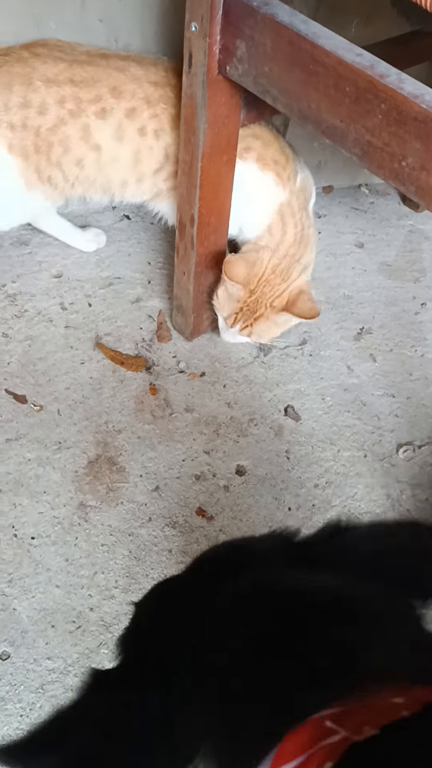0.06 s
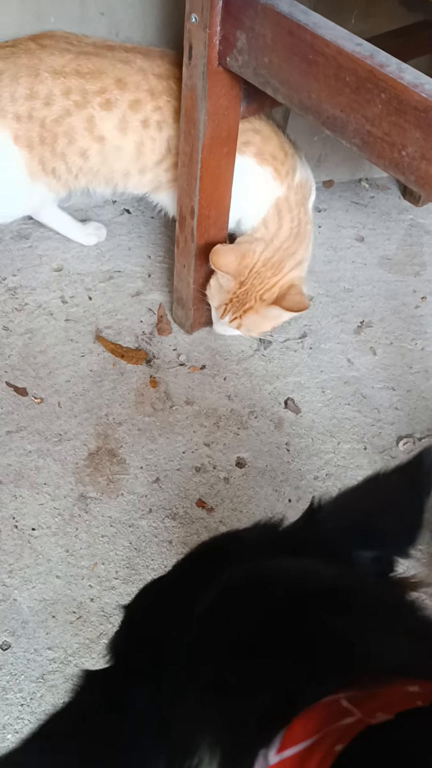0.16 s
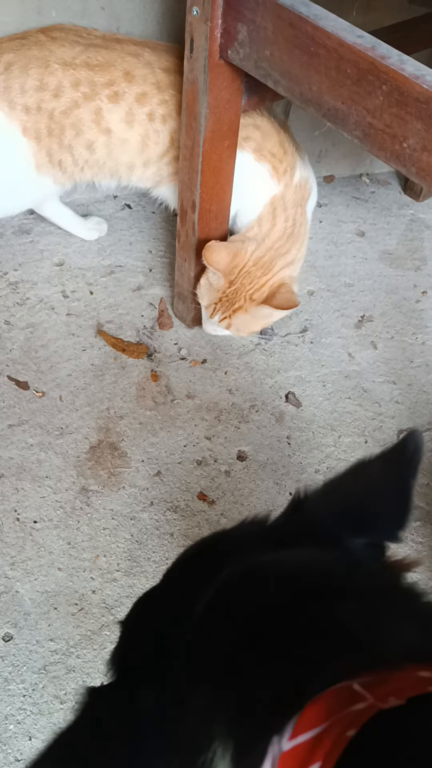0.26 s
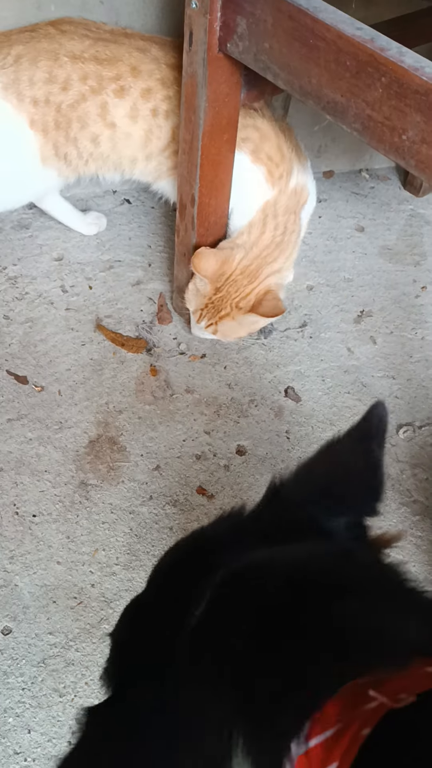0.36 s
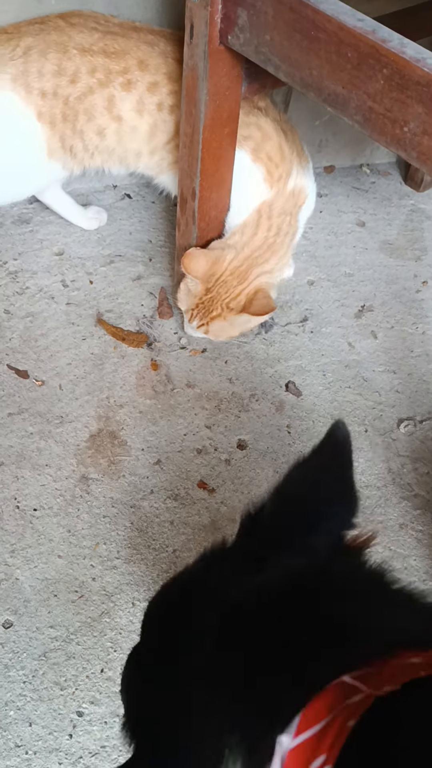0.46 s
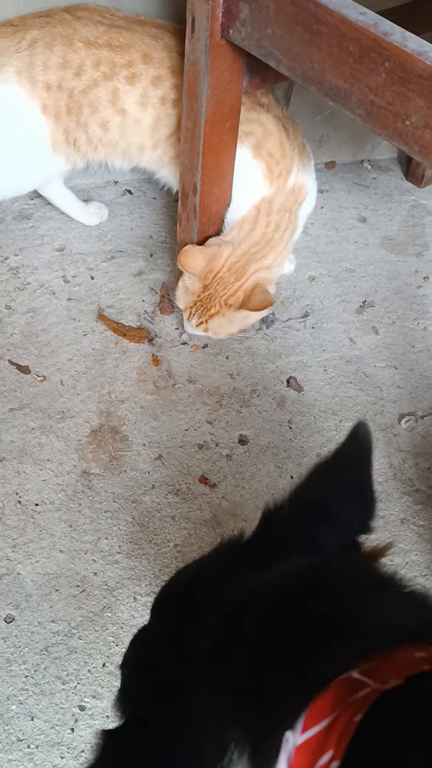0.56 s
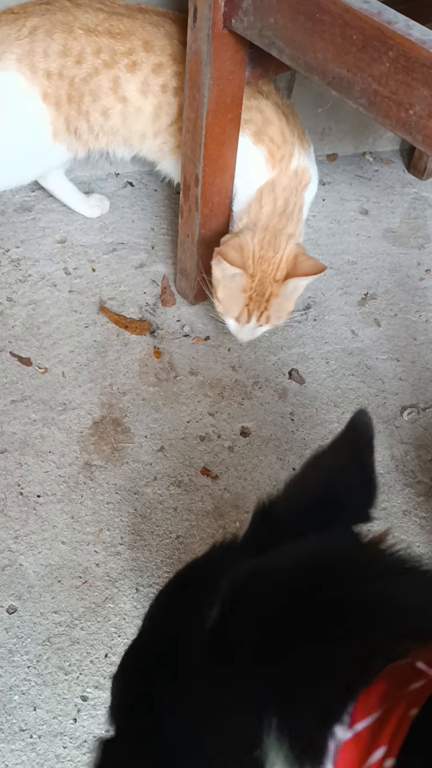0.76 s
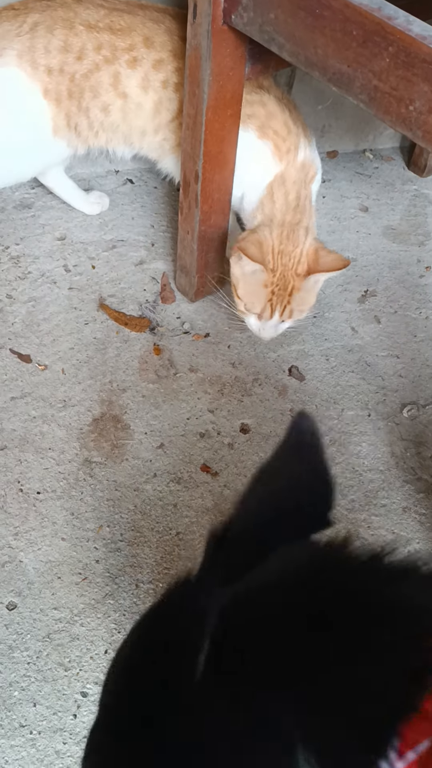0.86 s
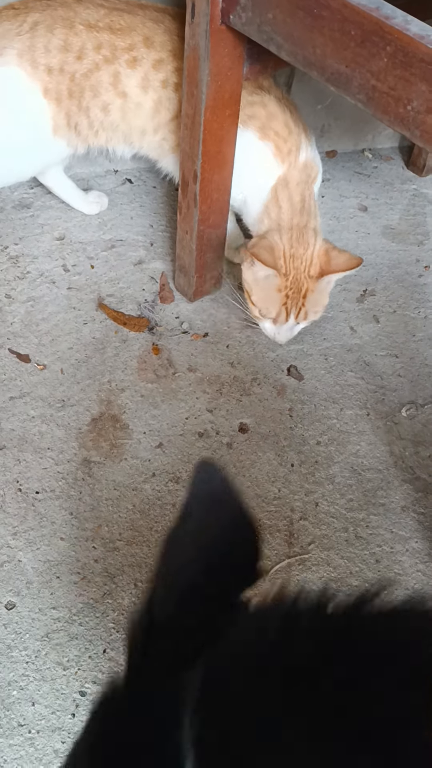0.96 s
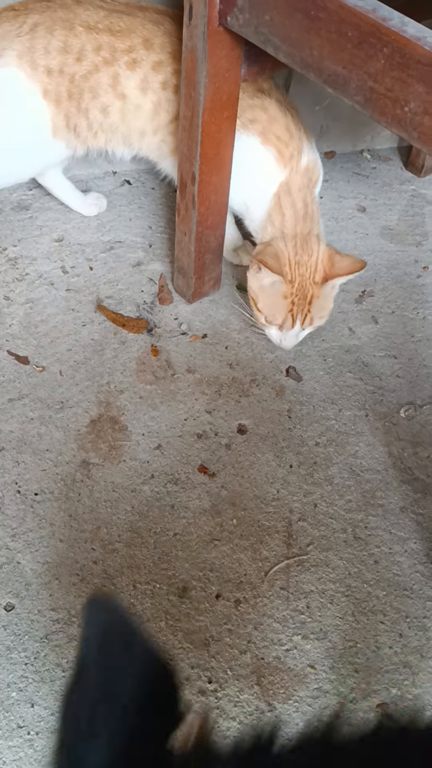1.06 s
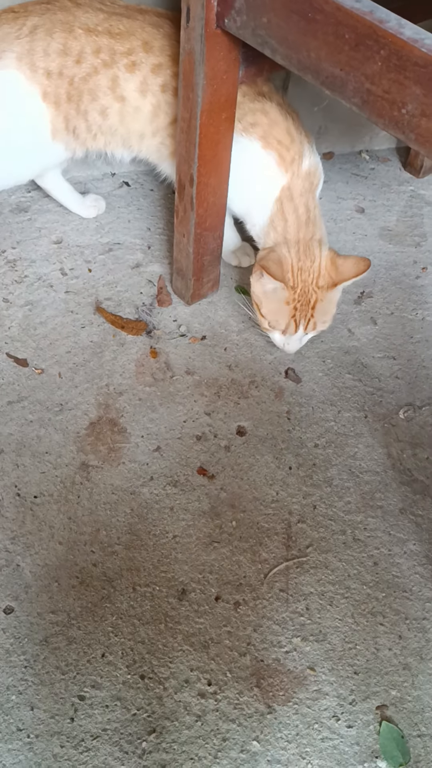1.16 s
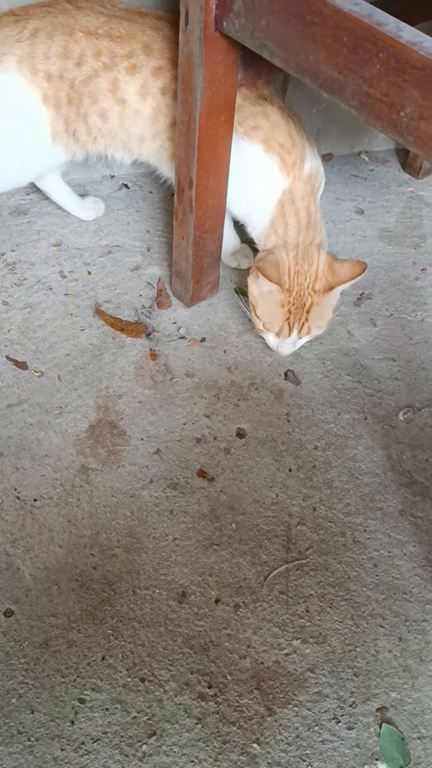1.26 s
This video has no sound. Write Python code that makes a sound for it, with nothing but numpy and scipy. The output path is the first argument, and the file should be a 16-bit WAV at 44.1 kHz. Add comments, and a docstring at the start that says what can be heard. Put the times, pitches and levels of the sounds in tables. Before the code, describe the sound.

Two sharp cat snarls close by, raspy spits over low growl, the second stronger and longer.

```python
"""Two snarls of a cat guarding its food

A cat snarls twice at another cat, on a concrete floor between hard walls.
Each snarl joins explosive spits of rasping, resonance-filtered air to surges of a low closed-mouth growl
and a short, cracked yowl, the stronger one in the second snarl.
Thin wheezes of narrow-band noise come before, between and after; a soft knock is heard near the start.
Beneath lie quiet air noise, a hum of wavering tones and a rumble of low noise that rises and falls."""
import sys
import numpy as np
from scipy import signal
from scipy.fft import rfft, irfft
from scipy.io import wavfile

SR = 44100
rng = np.random.default_rng(int(sys.argv[2]) if len(sys.argv) > 2 else 0)


def transcribe(u):
    """Save the signal u as a 16-bit wav file named by the first command-line argument.

    u: samples, shape (n,) or (channels, n), limited to [-1, 1]; the rate is SR.
    q: integer samples, one column per channel.
    """
    v = np.clip(np.atleast_2d(u).T, -1, 1)
    q = np.round(v * 32767).astype(np.int16)
    wavfile.write(sys.argv[1], SR, q)


N = 57330
T = np.arange(N) / SR  # s
HZ = np.fft.rfftfreq(N, 1 / SR)


def amp(db):
    """Decibel law: level to amplitude gain."""
    return 10 ** (np.asarray(db) / 20)


def unit(x):
    """Normalisation: scales to rms 1."""
    return x / np.sqrt(np.mean(x ** 2) + 1e-20)


def read(points, hz=HZ):
    """Interpolation: reads a table along a log-frequency axis."""
    f, value = np.transpose(points)
    return np.interp(np.log(hz + 1), np.log(f + 1), value)


def colour(x, db):
    """Linear filtering: each frequency gets its own gain in dB."""
    return irfft(rfft(x) * amp(db), N)


def noise(db):
    """Filtered noise: a random signal of rms 1 with the given spectrum."""
    return unit(colour(rng.standard_normal(N), db))


def band(hz, width_hz):
    """Steep resonance: a spectrum in dB, 6 dB down at width_hz either side."""
    return -20 * np.log10(1 + ((HZ - hz) / width_hz) ** 2)


def bump(hz, width_hz, lift_db):
    """Broad resonance: the lift in dB that it gives each frequency."""
    return lift_db / (1 + (2 * (HZ - hz) / width_hz) ** 2)


def envelope(start, rise, hold, t60, db):
    """Transient envelope: linear rise, hold and exponential decay."""
    attack = np.clip((T - start) / rise, 0, 1)
    fade_time = np.maximum(T - start - rise - hold, 0)
    return attack * amp(db - 60 * fade_time / t60)


def cycles(hz, jitter, rate_hz=90):
    """Frequency modulation: the phase of a vibration whose pitch wanders at random."""
    wander = jitter * noise(band(0, rate_hz))
    return 2 * np.pi * np.cumsum(hz * (1 + wander)) / SR


# likeness of left and right: (frequency [Hz], correlation [1])
LIKENESS = [(60, 1), (250, 0.86), (500, 0.63), (1000, 0.083), (2500, 0.017), (15000, 0.039)]


def pair(a, b):
    """Interchannel coherence: two unrelated signals become left and right, alike in the bass."""
    same = np.clip(read(LIKENESS), -1, 1)
    mid = rfft(a) * np.sqrt((1 + same) / 2)
    side = rfft(b) * np.sqrt((1 - same) / 2)
    return irfft([mid + side, mid - side], N)


# spectrum of the quiet air: (frequency [Hz], relative density [dB per Hz])
FLOOR_SPECTRUM = [(20, -40), (42, -49), (65, -11), (115, -1.5), (145, -17), (200, -10), (320, -14),
                  (450, -21), (600, -23.5), (850, -25.5), (1500, -30.5), (2300, -28), (4000, -35.5),
                  (7500, -46.5), (16000, -52)]
# steady tones of the hum: (frequency [Hz], level [dB])
HUM_TONES = [(75, -52), (269, -54.5), (317.6, -53.5), (587, -55)]
# course of the rumble: (time [s], level [dB])
RUMBLE_COURSE = [(0, -66), (.27, -56), (.41, -34.5), (.56, -61), (.75, -40.5), (.97, -53), (1.22, -39.5)]
FLOOR_DB = -42
HUM_WAVER = 0.0039  # rms share of pitch
RUMBLE_HZ, RUMBLE_WIDTH_HZ = 78.4, 7.3


def background():
    """Superposition: diffuse air noise, wavering hum tones and narrow-band rumble add."""
    air = amp(FLOOR_DB) * pair(noise(read(FLOOR_SPECTRUM)), noise(read(FLOOR_SPECTRUM)))
    hum = sum(amp(db) * unit(np.cos(cycles(hz, HUM_WAVER, rate_hz=6.1))) for hz, db in HUM_TONES)
    rumble_gain = amp(np.interp(T, *np.transpose(RUMBLE_COURSE)))
    rumble = rumble_gain * noise(band(RUMBLE_HZ, RUMBLE_WIDTH_HZ))
    return air + hum + rumble


# thin wheezes of the cat: (start [s], length [s], level before the rise and sink are applied [dB],
# whistle frequency [Hz], hiss relative to whistle [dB])
WHEEZE_EVENTS = [(0, 0.026, -38.5, 2280, 3), (0.078, 0.067, -43.5, 2280, -12.5),
                 (0.115, 0.04, -35, 2066, -10), (.156, 0.037, -44.5, 1930, -0.5),
                 (0.21, 0.061, -34, 2150, 0.5), (0.459, 0.045, -30.5, 2100, -4.5),
                 (0.742, 0.043, -47, 2170, -2), (1.095, 0.047, -50, 1900, -6),
                 (1.179, 0.042, -48.5, 2220, -15)]
# spectrum of the hiss: (frequency [Hz], relative density [dB per Hz])
WHEEZE_HISS = [(1000, -51), (2000, 2), (2900, -1.5), (3650, 8.5), (4400, -7.5), (5700, -4.5), (7500, -29),
               (16000, -28)]
WHEEZE_WIDTH_HZ, WHEEZE_RISE_S = 122, 0.011


def wheeze(start, length, db, hz, breathy_db):
    """Resonant noise: a fuzzy whistle and some hiss start quickly and sink."""
    rise = np.clip((T - start) / WHEEZE_RISE_S, 0, 1)
    sink = np.sqrt(np.clip(1 - (T - start) / length, 0, 1))
    whistle_air, hiss_air = (pair(*rng.standard_normal((2, N))) for _ in range(2))
    whistle = unit(colour(whistle_air, band(hz, WHEEZE_WIDTH_HZ)))
    hiss = unit(colour(hiss_air, read(WHEEZE_HISS)))
    return amp(db) * rise * sink * unit(whistle + amp(breathy_db) * hiss)


# soft knock: (start [s], rise [s], hold [s], fade t60 [s], level [dB])
KNOCK_EVENTS = [(.043, 0.0045, 0.0056, 0.096, -34)]
# spectrum of the knock: (frequency [Hz], relative density [dB per Hz])
KNOCK_SPECTRUM = [(100, -16), (300, 12.5), (500, 3.5), (750, -3), (1120, 4), (1500, -44), (5000, -49)]


def knock(start, rise, hold, t60, db):
    """Damped impact: a short burst of dull noise dies away."""
    return envelope(start, rise, hold, t60, db) * noise(read(KNOCK_SPECTRUM))


# blasts of air: (start [s], rise [s], hold [s], fade t60 [s], level [dB],
# throat [dB], mouth [dB], teeth [dB], fizz [dB], extra resonance of this blast [Hz])
SPIT_EVENTS = [(0.241, 0.009, 0.016, 0.1, -15.5, 3, 6, 0.5, 7, 1082),
               (0.272, 0.0059, 0.18, 0.27, -33.5, -6, -3.5, 0, -2.5, 1507),
               (0.391, 0.013, 0.0041, 0.14, -20.5, 1.5, -3, 6, 0, 810),
               (0.501, 0.009, 0.016, 0.22, -15, -1, 1, 1.5, -2.5, 560),
               (.567, 0.0046, 0.039, 0.15, -25, 6, -2, 3, -3, 1710),
               (0.621, 0.013, 0.024, 0.12, -18, -3, 3, 4, 1, 2050),
               (0.804, 0.01, 0.0045, 0.15, -20.5, 3.5, 2.5, 3.5, 5, 2307)]
# where throat, mouth, teeth and fizz act: (frequency [Hz])
TONE_HZ = [420, 1100, 2500, 9000]
# spectrum of the blown air: (frequency [Hz], relative density [dB per Hz])
SPIT_AIR = [(40, -55), (125, -47), (175, -8), (240, 4), (400, -0.5), (650, -4), (1000, -7), (1800, -5.5),
            (3000, -12), (4200, -16), (7500, -26.5), (11000, -30.5), (16000, -39)]
# resonances of throat and mouth: (frequency [Hz], width [Hz], lift [dB])
TRACT_RESONANCES = [(454.7, 22.3, 10.5), (573.8, 29, 8), (770, 91, 6), (985, 310, 7.5), (1575, 200, 4.5),
                    (1990, 100, 4), (2446, 430, 3.5), (3323, 250, 5.5)]
RASP_HZ = 198.85
RASP_DEPTH, RASP_JITTER = 0.45, 0.22  # share of the airflow, rms share of the rasp rate
EXTRA_WIDTH_HZ, EXTRA_DB = 130, 9


def spit(start, rise, hold, t60, db, throat_db, mouth_db, teeth_db, fizz_db, extra_hz):
    """Source and filter: air modulated by the fluttering throat excites the mouth's resonances."""
    flutter = 1 + RASP_DEPTH * np.cos(cycles(RASP_HZ, RASP_JITTER))
    raspy_air = flutter * pair(*rng.standard_normal((2, N)))
    tone = read(list(zip(TONE_HZ, [throat_db, mouth_db, teeth_db, fizz_db])))
    resonances = sum(bump(*row) for row in TRACT_RESONANCES)
    extra = bump(extra_hz, EXTRA_WIDTH_HZ, EXTRA_DB)
    blast = unit(colour(raspy_air, read(SPIT_AIR) + tone + resonances + extra))
    return envelope(start, rise, hold, t60, db) * blast


# short cracked cries: (start [s], rise [s], hold [s], fade t60 [s], level [dB], pitch reached [Hz])
YOWL_EVENTS = [(0.2432, .003, 0.01, 0.14, -22, 505), (0.5023, 0.0033, 0.015, 0.15, -13.5, 515.3)]
# strength of the yowl's harmonics: (frequency [Hz], relative level [dB])
YOWL_HARMONICS = [(380, 8.5), (550, -0.5), (1000, -6), (1550, -8.5), (2050, -4), (2600, -18), (5000, -34)]
YOWL_FROM_HZ, YOWL_GLIDE_S = 320, 0.00907  # starting pitch, time constant of the glide
YOWL_JITTER = 0.025  # rms share of pitch
YOWL_FLUTTER_HZ, YOWL_FLUTTER = 100, 0.6  # rate and depth of the stutter
YOWL_OPEN_S = 0.015  # time constant for the mouth to open and let the overtones out


def yowl(start, rise, hold, t60, db, top_hz):
    """Harmonic synthesis: the voice cracks upward into a short cry, stuttering in amplitude."""
    age = np.maximum(T - start, 0)
    hz = top_hz + (YOWL_FROM_HZ - top_hz) * np.exp(-age / YOWL_GLIDE_S)
    phase = cycles(hz, YOWL_JITTER, rate_hz=270)
    stutter = 1 + YOWL_FLUTTER * np.sin(2 * np.pi * YOWL_FLUTTER_HZ * age)
    note, *over = (amp(read(YOWL_HARMONICS, k * hz)) * np.cos(k * phase + 2 * np.pi * rng.random())
                   for k in range(1, 10))
    mouth_opening = 1 - np.exp(-age / YOWL_OPEN_S)
    cry = note + mouth_opening * sum(over)
    return envelope(start, rise, hold, t60, db) * unit(stutter * cry)


# surges of the voice: (start [s], rise [s], hold [s], fade t60 [s], level of the note [dB],
# overtones relative to the note [dB])
GROWL_SURGES = [(0.247, 0.012, 0.0067, 0.18, -13, -7), (0.297, 0.016, 0.0077, 0.11, -23, -6),
                (0.39, 0.013, 0.032, 0.04, -30.5, -12), (0.466, 0.0083, .012, 0.054, -28, -5.5),
                (0.582, 0.012, 0.014, 0.13, -20, -20.5), (0.658, 0.006, 0.0084, 0.31, -18, -25.5),
                (0.819, 0.016, 0.008, 0.13, -18.5, -14.5), (0.854, 0.024, 0.016, 0.083, -27, -32)]
# balance among the overtones: (frequency [Hz], relative level [dB])
GROWL_OVERTONES = [(500, 0.5), (750, -3), (1000, -10), (1250, -5), (1500, 1.5), (1750, -3), (2500, -29),
                   (3000, -10)]
GROWL_HZ = 250.7
GROWL_JITTER = 0.0217  # rms share of pitch


def growl():
    """Harmonic synthesis: one low note with weaker overtones is pushed in surges."""
    phase = cycles(GROWL_HZ, GROWL_JITTER)
    note = unit(np.cos(phase))
    over = unit(sum(amp(read(GROWL_OVERTONES, k * GROWL_HZ)) * np.cos(k * phase + 2 * np.pi * rng.random())
                    for k in range(2, 13)))
    return sum(envelope(*shape) * (note + amp(overtones_db) * over)
               for *shape, overtones_db in GROWL_SURGES)


# reverberation time: (frequency [Hz], t60 [s])
ROOM_T60 = [(150, 0.53), (500, 0.24), (2000, 0.17), (5000, 0.13), (14000, 0.097)]


def room(x):
    """Reverberation: dense echoes from floor and walls decay, the treble dying first."""
    hz, t, grains = signal.stft(rng.standard_normal((2, N)), SR, nperseg=256)
    decay = amp(-60 * t / read(ROOM_T60, hz)[:, None])
    tails = signal.istft(grains * decay, SR, nperseg=256)[1][:, :N]
    onset = np.minimum(T / 0.001, 1)  # 1 ms rise
    tails = pair(*(tails * onset))[:, :N // 2]
    return signal.fftconvolve(x, tails / np.linalg.norm(tails[0]), axes=1)[:, :N]


AIR_WET_DB, DULL_WET_DB = -2.5, -17  # sent to the room: air sounds; voice and knock


def scene():
    """Superposition: the direct sounds and their echoes add to the background."""
    air = sum(wheeze(*row) for row in WHEEZE_EVENTS) + sum(spit(*row) for row in SPIT_EVENTS)
    voice = sum(yowl(*row) for row in YOWL_EVENTS) + growl()
    dull = voice + sum(knock(*row) for row in KNOCK_EVENTS)
    echoes = room(amp(AIR_WET_DB) * air + amp(DULL_WET_DB) * dull)
    return air + dull + echoes + background()


# colour of the two microphones: (frequency [Hz], left minus right [dB])
MICROPHONE_LEAN = [(60, 2), (200, -1), (450, -4.5), (900, -.5), (2400, 1), (3400, -0.5), (4800, -4.5),
                   (6500, -5.5), (8500, 6.5), (14000, 10)]
CEILING, EDGE_HZ = 0.85, 16100  # full scale 1; upper band limit


def record(dry):
    """Transduction: microphone colours, soft saturation of the highest peaks, then a low-pass filter."""
    heard = colour(dry, np.outer([1, -1], read(MICROPHONE_LEAN)) / 2)
    heard = heard / (1 + (heard / CEILING) ** 6) ** (1 / 6)
    low_pass = signal.firwin(511, EDGE_HZ, window=("kaiser", 9), fs=SR)
    return signal.oaconvolve(heard, low_pass[None], "same")


dry = scene()
out = record(dry)
transcribe(out)
```